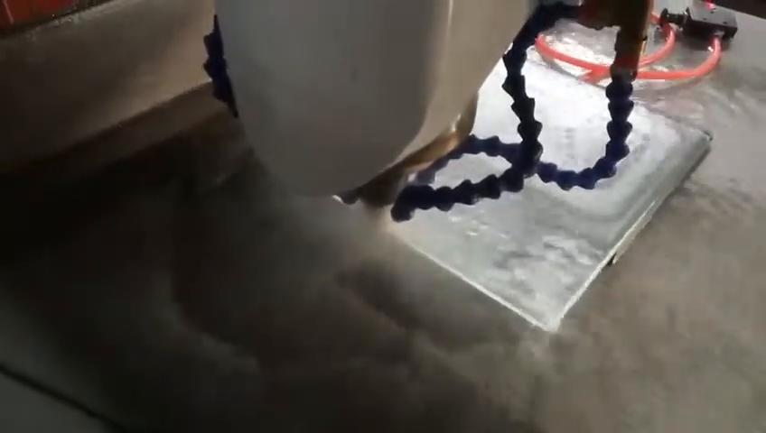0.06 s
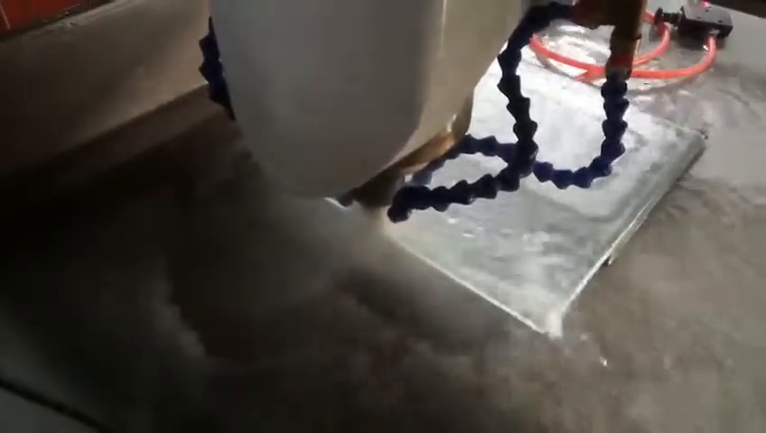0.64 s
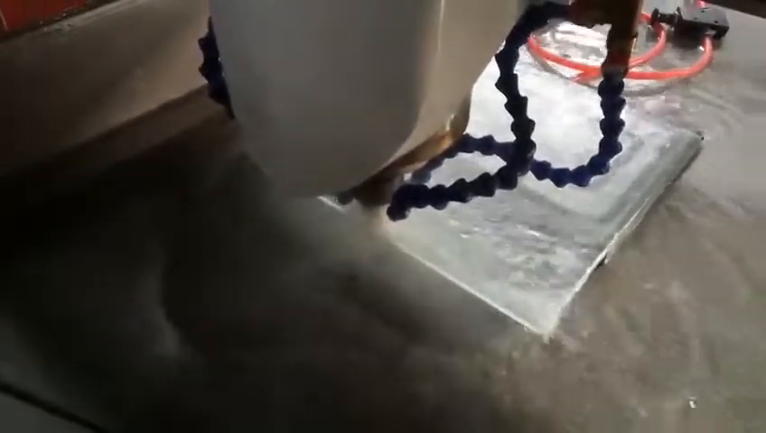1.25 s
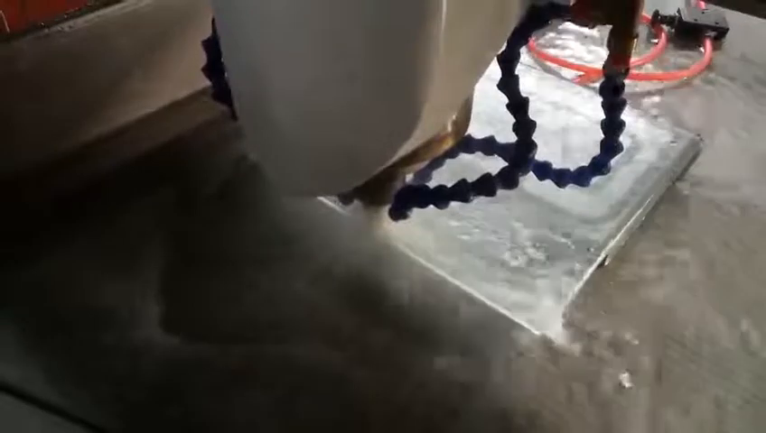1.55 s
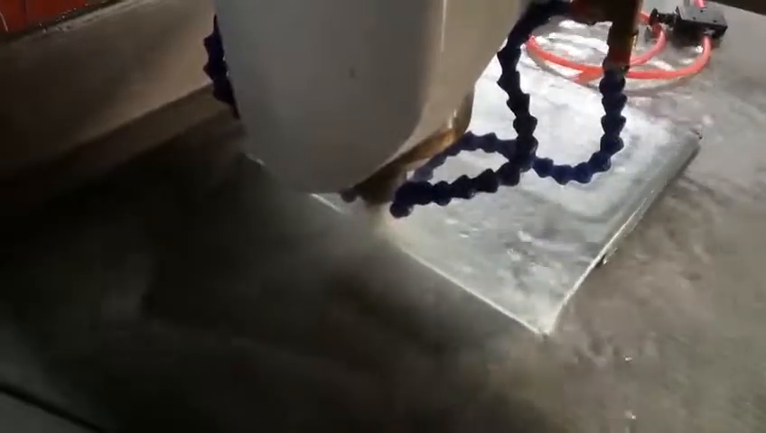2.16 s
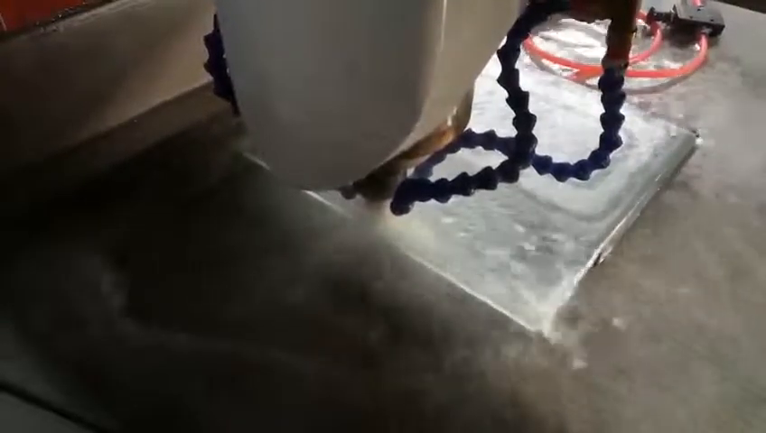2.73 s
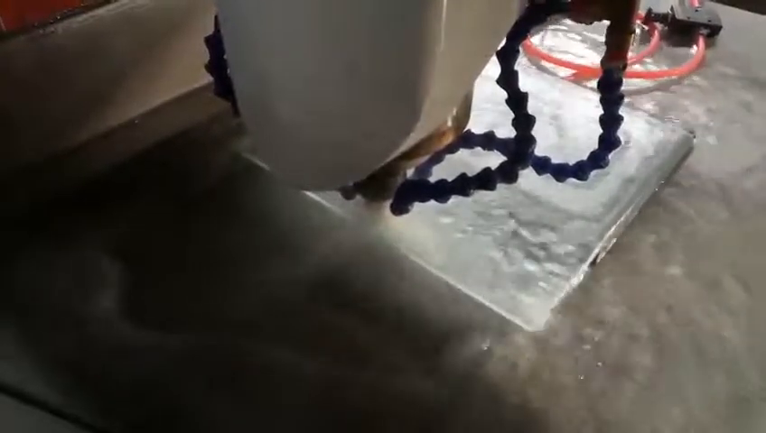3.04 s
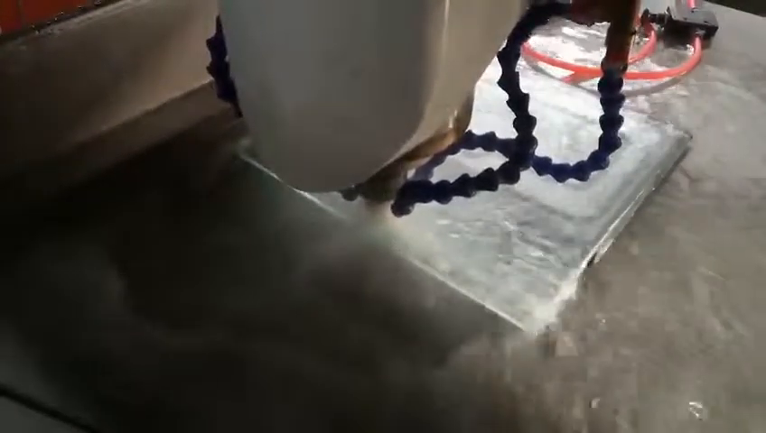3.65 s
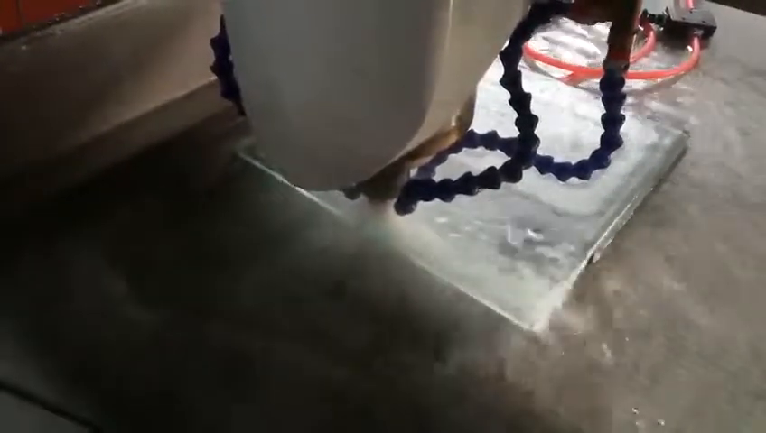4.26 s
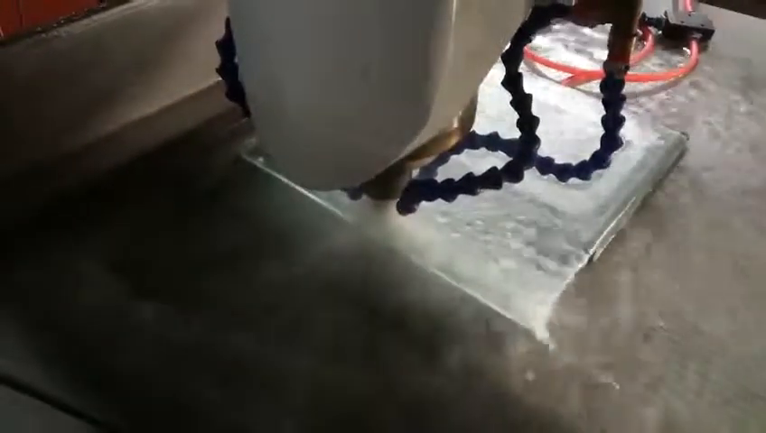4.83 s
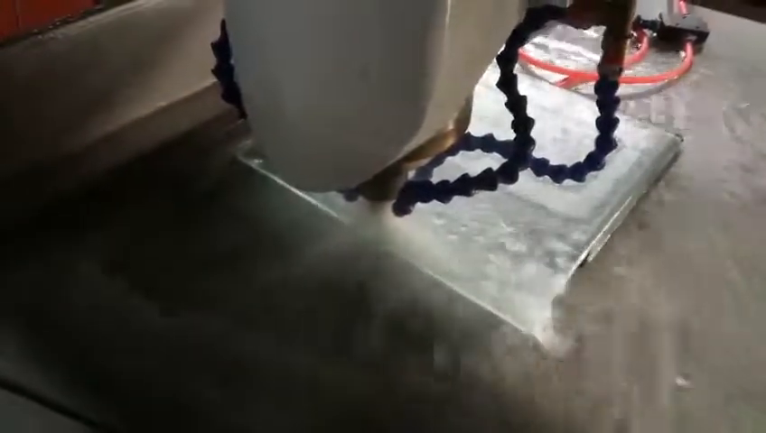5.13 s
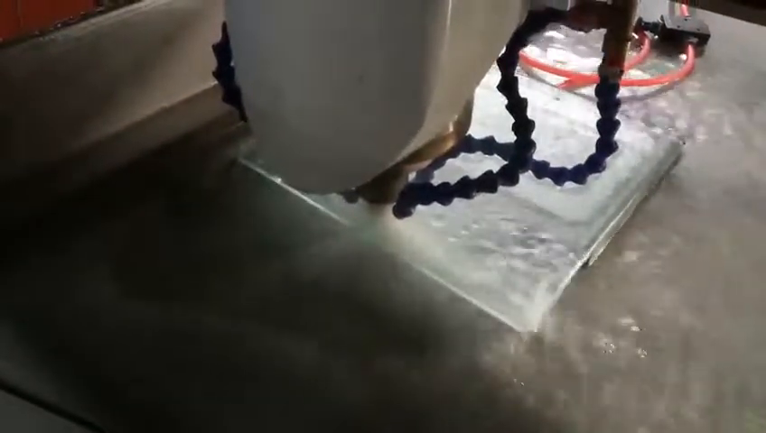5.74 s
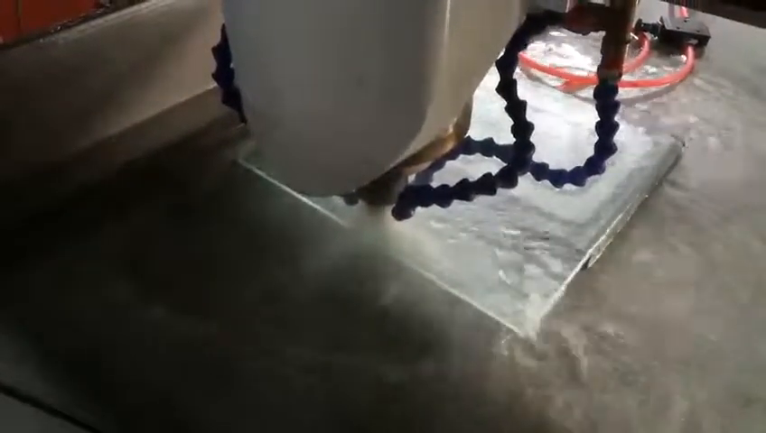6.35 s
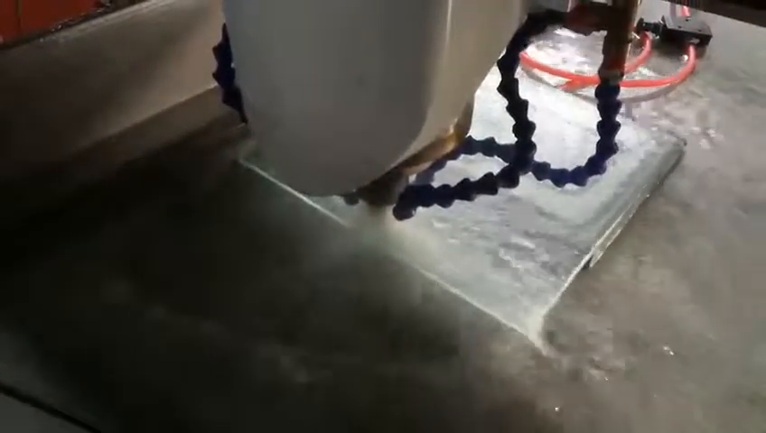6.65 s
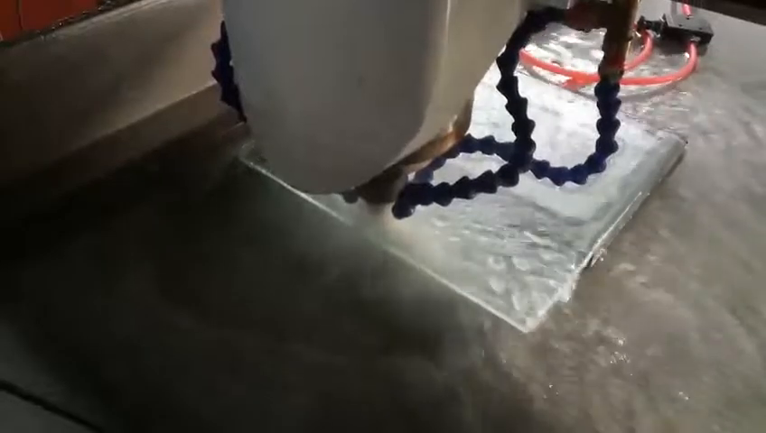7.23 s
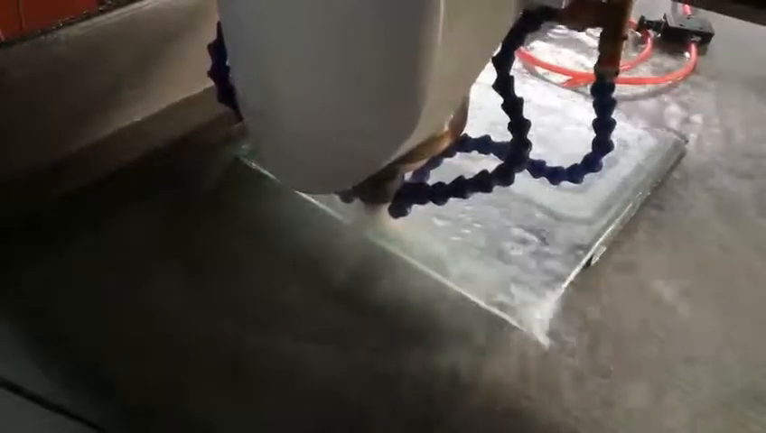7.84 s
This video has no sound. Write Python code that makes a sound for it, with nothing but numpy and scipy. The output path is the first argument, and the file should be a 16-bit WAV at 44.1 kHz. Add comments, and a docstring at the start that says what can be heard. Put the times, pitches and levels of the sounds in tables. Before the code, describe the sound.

Close, high-pitched whine of a tool grinding glass, with a steady hiss of grit and water and a run of shrill squeals.

```python
"""A stereo microphone close to a CNC spindle grinding the edge of a glass sheet under jets of water.
At first the tool, at about 24000 rpm, sings at multiples of its speed over a hiss of grit and spray;
a thin whistle comes in, and there is one short knock. Midway the cut tightens and glass and tool
chatter in a series of squeals. Then it runs freer and throws more spray, the machine's rumble surges
and the edge chips. A limiter holds down the highest peaks."""
import sys
import numpy as np
from scipy import signal
from scipy.io import wavfile
from scipy.ndimage import uniform_filter1d, minimum_filter1d

SR = 44100
rng = np.random.default_rng(int(sys.argv[2]) if len(sys.argv) > 2 else 0)


def generate_wav(signal):
    """Clip the signal to [-1, 1] and save it as 16-bit WAV at the path in sys.argv[1]."""
    frames = np.transpose(np.atleast_2d(signal))
    scaled = np.clip(frames, -1, 1) * 32767
    pcm = np.round(scaled).astype(np.int16)
    wavfile.write(sys.argv[1], SR, pcm)


N = 347949
TIME = np.arange(N) / SR

# The tool's tones from close by, keyed by order (multiple of its speed). Each row: relative level in dB
# in the full, tight and free cut, left over right in dB, phase lead of the left microphone in radians.
TOOL_ORDERS = {1: (-48, -53.5, -34, -4.5, 2.5), 2: (-18.5, -28.5, -27.5, 4, -1.87),
               3: (-40.5, -43.5, -39.5, 2.5, -1.5), 4: (-38, -33, -23.5, 4, -1.18),
               5: (-25, -32.5, -24, 5.5, 0.73), 6: (-38, -33.5, -26, 5, 1.2), 7: (-45, -38, -53, 1.5, -2.5),
               8: (-32.5, -41, -45, -3, -0.5), 9: (-17.5, -21.5, -23, -4, 0.5),
               10: (-34, -34.5, -27.5, 1.5, -2), 11: (-45, -35, -24.5, 8, 0.8),
               12: (-31, -36, -28.5, -2, -1.7), 13: (-45, -48, -31.5, 7, 0.5), 14: (-35, -32, -39, 8, 1),
               15: (-35.5, -40, -31, 8, 0.4), 16: (-45, -50, -29.5, 9, 1.24),
               17: (-32.5, -25.5, -28, 11, -3), 18: (-28.5, -27, -32.5, 9, -1.7),
               19: (-35, -50, -44, 3, 2.5), 20: (-29.5, -34, -23, 0.5, 3), 21: (-21, -28, -20, 13.5, 0.07),
               22: (-34, -36, -25.5, 9, 0.5), 23: (-40, -42, -34, 7, 0.7), 25: (-43, -47, -31.5, 9, 1.5),
               26: (-40, -53, -29.5, 2, -2)}
# As the tool travels, an order swells on a resonance of the sheet or fades at a node.
# Each row, under its order: middle in seconds, length in seconds, change in dB.
SHEET_SWELLS = {1: [(0.3, 2.45, 12)], 2: [(0.8, 0.38, -5.5), (5.0, 0.38, -3.5), (7.05, 1.3, -10)],
                3: [(0.1, 0.61, 9.5), (3.1, 0.82, 7.5), (5.68, 1, 10.5), (7.8, 0.64, 6)],
                4: [(0.55, 1.2, 9.5), (2.8, 0.34, 6), (4.05, 1.15, -14), (6.15, 0.58, 4.5),
                (6.9, 0.52, -3.5)], 5: [(0.23, 0.12, 3.5), (0.8, 0.38, 8.5), (1.7, 0.31, 4.5), (3.3, 1, 4),
                (5.35, 0.41, 5.5), (6.17, 0.41, 5.5), (7.7, 0.75, 6)], 6: [(0.55, 1.0, 11), (3.2, 1.3, -4)],
                7: [(0.7, 1.0, 7)], 8: [(1.05, 0.38, 7), (3.0, 0.71, 5), (4.3, 0.56, 5)],
                9: [(0.28, 0.73, -11.5), (3.3, 0.3, 3.5), (5.05, 0.49, -9), (7.85, 0.42, -3)],
                10: [(0.5, 1.9, 7.5), (6.8, 1.5, 7.5)], 11: [(5.65, 1.05, -4)], 16: [(6.68, 0.53, 9.5)],
                20: [(0.6, 0.9, 6), (6.9, 0.65, -6)], 21: [(0.17, 0.082, 8.5), (0.5, 0.29, 8),
                (2.35, 0.81, -14)], 25: [(6.05, 0.6, 8)]}
# Orders that reach the microphones straight from the sheet, so reflections sway them little.
DIRECT_ORDERS = [1, 2, 3, 4, 5, 6, 9, 10, 11, 21]
# Orders that move as the tool comes free. Each row: final left over right in dB, left lead in radians.
FREE_CUT_IMAGE = {1: (8.9, 0), 2: (9.3, -1.36), 5: (-1.2, 0.58), 6: (17, 2.17), 9: (9.5, 2.3),
                  10: (-0.92, -0.6)}
# The tool skates during the shriek and upper orders drop: middle and length in seconds, change in dB.
TOOL_SKATE = (5.0, 0.21, -3.5)
# Order 2 meets the two microphones equally loud, in opposite phase: middle and length in seconds.
OPPOSED_SPAN = (6.48, 0.55)


def spindle(angle, shake=0.12, shake_per_order=0.027, shake_hz=22, drift=0.47, drift_hz=1.73):
    """The tool strikes the glass once a turn; an uneven bite shakes the high orders most."""
    state, out = cut_state(TIME), np.zeros((2, N))
    bite = 1 - 0.27 * state / 2  # calmer as the cut runs free
    freed = np.clip(state - .8, 0, 1)
    skate_db = swells_db([TOOL_SKATE], TIME)
    shared_shake = flutter(shake_hz * 2, TIME).real
    for order, (*levels, balance_db, lead) in TOOL_ORDERS.items():
        db = by_state(levels, state) + swells_db(SHEET_SWELLS.get(order, []), TIME)
        db += (order > 4) * skate_db
        rough = (shake + shake_per_order * order) * bite
        phase = rng.uniform(-np.pi, np.pi)  # sheet and housing delay each order differently
        shaken = (1 + rough * (flutter(shake_hz, TIME) + 0.42 * shared_shake)) / np.sqrt(1 + rough ** 2)
        tone = amp(db) * np.exp(1j * (order * angle + phase)) * shaken
        # the travelling head shifts the reflections at each microphone
        reflections = np.array([flutter(drift_hz, TIME), flutter(drift_hz, TIME)])
        reflections *= drift * (.3 if order in DIRECT_ORDERS else .9)
        if order in FREE_CUT_IMAGE:
            free_db, free_lead = FREE_CUT_IMAGE[order]
            balance_db += (free_db - balance_db) * freed
            lead += (free_lead - lead) * freed
        if order == 2:
            opposed = hump(TIME, *OPPOSED_SPAN)
            balance_db *= 1 - opposed
            lead -= (np.pi + lead) * opposed
        out += (tone * (mic_gains(balance_db, lead) + reflections)).real
    return out


# The spindle's speed. Each row: time in seconds, turns per second.
SPINDLE_SPEED = [(0.0, 401.42), (0.9, 401.53), (1.44, 401.38), (2.52, 401.31), (3.48, 401.29),
                 (4.57, 401.68), (5.82, 401.76), (6.54, 401.89), (7.88, 401.81)]


def turns_per_s(t):
    """The spindle holds its speed almost steady."""
    return curve(SPINDLE_SPEED, t)


# The course of the cut. Each row: time in seconds, state (0 full, 1 tight and chattering, 2 free).
CUT_COURSE = [(0, 0), (3.2, 0.13), (3.7, 0.72), (4.2, 0.98), (5.05, 1.36), (5.5, 1.85), (5.85, 1.8),
              (6.05, 2.0)]


def cut_state(t):
    """The tool starts in a full cut, tightens, then runs free."""
    return curve(CUT_COURSE, t)


# Ways in which glass and tool chatter. Each row: roughness, share of haze, squareness of the swell, left
# over right in dB, left lead in radians, sidebands as pairs of offset in orders and relative dB.
CHATTER_KINDS = { "whistle": (0.45, 0.25, 6, 15, -2.04, [(-3, -14), (1, -13), (2, -18.5), (3, -16.5),
                 (5, -9.5), (7, -21)]), "howl": (0.15, 0, 3, 1, 1.34, [(-1, -23.5), (1, -12), (2, -21),
                 (3, -20.5), (4, -6), (5, -10), (6, -15.5), (9, -16)]),
                 "screech": (0.56, 0.71, 3.4, 9, 2, [(-5, -17.5), (-1, -12), (1, -5.5), (2, -8), (3, -7),
                 (4, -15), (5, -10.5)]), "shriek": (0.39, 0.28, 3.2, 9.5, -1.25, [(1, -10.5), (4, -20)]),
                 "squeak": (0.22, 0.14, 1.9, 9.3, 1.4, [(-1, -20), (3, -10), (7, -4.5)]),
                 "rasp": (1.5, 1, 2.7, 4.2, 0.37, [(-1, -3), (5, 3), (15, 1), (16, -1)])}
# Chatter that knocks hard enough to have overtones. Each row: multiple of its pitch, relative dB.
CHATTER_OVERTONES = {"howl": [(3, -14.5), (4, -16), (5, -14)]}
# Squeals at the cut. Each row: kind, middle in seconds, length in seconds, pitch in Hz,
# glide in Hz per second, relative level in dB.
CHATTER_BURSTS = [("whistle", 2.32, 2.25, 8724, -2, -17), ("whistle", 3.75, 0.64, 8709, -18, -11),
                  ("howl", 3.78, 0.32, 1965, 8.6, -27), ("howl", 4.35, 0.76, 1978, 27, -19.5),
                  ("screech", 4.47, 1.05, 7155, 0, -19.5), ("shriek", 4.96, 0.21, 6793, 39, -10.5),
                  ("squeak", 5.122, 0.098, 5585, 0, -15.5), ("screech", 5.42, 0.6, 7155, 0, -19),
                  ("squeak", 5.52, 0.16, 5592, 0, -26), ("squeak", 5.875, 0.28, 5595, -8, -14.5),
                  ("howl", 6.09, 0.17, 1990, 0, -26.5), ("rasp", 7.15, 0.55, 1938, 0, -35.5),
                  ("rasp", 7.8, 0.35, 1935, 0, -38)]


def chatter(angle, rough_hz=18, waver_hz=2.6, full_cut_waver_hz=15, haze_hz=220):
    """Self-excited vibrations swell and die; the turning tool chops each into sidebands."""
    out = np.zeros((2, N))
    for kind, middle, length, pitch_hz, glide, level_db in CHATTER_BURSTS:
        rough, haze, squareness, balance_db, lead, sidebands = CHATTER_KINDS[kind]
        on = abs(TIME - middle) < length
        t = TIME[on]
        # in the full cut the grit keeps knocking the squeal off its pitch
        unsettled = np.clip(1 - 2 * cut_state(t), 0, 1)
        waver = (waver_hz + full_cut_waver_hz * unsettled) * flutter(rough_hz, t).real
        hz = pitch_hz + glide * (t - middle) + waver
        rough = rough + unsettled
        shaken = (1 + rough * flutter(rough_hz, t)) / np.sqrt(1 + rough ** 2)
        swing = np.exp(2j * np.pi * np.cumsum(hz) / SR)
        tone = amp(level_db) * hump(t, middle, length, squareness) * shaken * swing
        # grit smears the squeal into a band of noise
        smear = 1 + haze * np.array([flutter(haze_hz, t), flutter(haze_hz, t)])
        out[:, on] += (tone * smear * mic_gains(balance_db, lead)).real
        for multiple, db in CHATTER_OVERTONES.get(kind, []):
            out[:, on] += (amp(db) * tone * swing ** (multiple - 1) * mic_gains(balance_db, 0)).real
        for offset, db in sidebands:
            phase, side_lead = rng.uniform(-np.pi, np.pi, 2)
            chop = np.exp(1j * (offset * angle[on] + phase)) * (1 + rough / 2 * flutter(rough_hz, t))
            out[:, on] += (amp(db) * tone * chop * mic_gains(balance_db * 2.2, side_lead / 2)).real
    return out


# Abrasive grit scratching the glass, heard close up.
# Each row: frequency in Hz, relative noise density in dB in the full, tight and free cut.
GRIT_SPECTRUM = [(378, -69.5, -70, -75), (780, -50, -55, -59.5), (1140, -62.5, -61, -82),
                 (1560, -64, -57, -53), (2030, -49, -56, -52), (2320, -50.5, -56.5, -54.5),
                 (3020, -59, -61.5, -62), (3880, -45.5, -58, -47), (4100, -49.5, -59, -55.5),
                 (5830, -55.5, -49.5, -55.5), (7400, -52.5, -51.5, -51), (8730, -40, -41, -42.5),
                 (8860, -60, -39, -55), (10440, -51, -53.5, -58.5), (12600, -59, -65, -55),
                 (14300, -76, -74, -72)]


def grit(hz, off_ridge_hz, state, speed, ridge_hz=58):
    """Each turn recuts the last turn's scratches, so noise gathers in ridges just under the orders."""
    ridges = (hz > speed / 2) / (1 + (off_ridge_hz / ridge_hz) ** 2) ** 2
    return amp(spectrum_db(GRIT_SPECTRUM, hz, state)) * ridges


# Hiss of spray over low rumble. Each row: frequency in Hz, relative noise density in dB in the full, tight and
# free cut.
SPRAY_SPECTRUM = [(25, -79, -82, -76), (58, -76, -74, -77), (86.5, -64.5, -63, -65), (150, -78, -80, -65.5),
                  (239, -77, -76, -68), (610, -66, -71.5, -64.5), (1530, -69.5, -72.5, -65.5),
                  (1930, -59, -79, -55.5), (2240, -63.5, -99, -76), (2420, -66, -85, -62),
                  (2930, -76.5, -67, -61), (3370, -58, -79, -67), (3830, -53, -60, -59.5),
                  (4300, -61, -65, -56), (6000, -58.5, -63.5, -60), (7700, -55, -57, -55.5),
                  (10250, -56, -57, -56.5), (13160, -64, -66, -69.5), (13900, -68, -62, -58.5),
                  (14300, -76, -84, -80)]


def spray(hz, off_ridge_hz, state, speed, valley_db=7, valley_below_hz=5500):
    """Spray hiss, thinner in the midrange between the tool's tones, most of all in the tight cut."""
    between = np.sin(np.pi * off_ridge_hz / speed) ** 2 * (hz > speed)
    midrange = 1 / (1 + (hz / valley_below_hz) ** 6)
    thinning_db = valley_db * between * midrange * by_state((.6, 1, .3), state)
    return amp(spectrum_db(SPRAY_SPECTRUM, hz, state) - .5 - thinning_db)


# Water thrown off the tool. Each row: time in seconds, relative strength in dB.
SPLASH_STRENGTH = [(0, 1.5), (.45, 1), (.7, -0.5), (1.3, -0.5), (3.1, 0), (4.8, -0.5), (5, -5), (5.3, -4.5),
                   (5.9, -1), (6.3, -4), (6.7, -1.5), (7.15, 0.5), (7.55, -1.2), (7.89, -0.5)]
# Surges of the machine's low rumble. Each row: middle in seconds, length in seconds, rise in dB.
RUMBLE_SURGES = [(6.773, 0.24, 11), (7.45, 0.84, 10.5)]
# Narrow dips in the hiss. Each row: frequency in Hz, width in Hz, depth in dB.
HISS_DIPS = [(962, 44, 7.5), (1750, 34, 9), (2220, 57, 9), (13340, 360, 6.5)]
# The hiss at the microphone pair. Each row: frequency in Hz, coherence, left lead in radians,
# left over right in dB.
HISS_IMAGE = [(30, 0.18, 2, 7), (111.5, 0.95, 3.07, 1), (250, 0.89, 3.07, 1), (550, 0.81, 3.6, 2),
              (1030, 0.55, 3.77, 5), (1620, 0.19, 5.9, 5), (2640, 0.67, 9.38, 1), (3410, 0.36, 12.6, 1),
              (4260, 0.47, 15.7, -3), (5050, 0.21, 18.7, 2.5), (6500, 0.16, 23.3, 7), (8560, 0.15, 28.1, 5),
              (12600, 0.2, 30.76, 0)]


def hiss(lags_hz=(36, 12, 62), slip=0.0099, patchy_db=2, flicker_db=1.5, splash_hz=4500, rumble_hz=125):
    """Grit, spray and rumble reach the two microphones as one flickering, partly coherent noise."""
    frames = dict(fs=SR, nperseg=2048, noverlap=1536)
    white = rng.standard_normal((2, N)) * np.sqrt(SR / 2)
    hz, t, (shared, separate) = signal.stft(white, **frames)
    hz, state, speed = hz[:, None], cut_state(t), turns_per_s(t)
    # in the tight cut the chatter runs slower than the tool, so the high ridges fall further behind
    lag_hz = by_state(lags_hz, state) + slip * hz * by_state((0, 1, 0), state)
    off_ridge_hz = (hz + lag_hz + speed / 2) % speed - speed / 2
    bass = 1 / (1 + (hz / rumble_hz) ** 6)
    surge_db = bass * (hz > 50) * swells_db(RUMBLE_SURGES, t)
    # a heavier splash mostly fills out the midrange; the fine mist stays steadier
    splash_db = curve(SPLASH_STRENGTH, t) * (0.49 + 1 / (1 + (hz / splash_hz) ** 2)) * (1 - bass)
    wash = spray(hz, off_ridge_hz, state, speed) * amp(splash_db + surge_db)
    scratch = grit(hz, off_ridge_hz, state, speed) * amp(splash_db / 2)
    patches = uniform_filter1d(rng.standard_normal(shared.shape), size=12, axis=0)
    patches = uniform_filter1d(patches, size=4, axis=1)
    uneven_db = patchy_db * patches / patches.std() + flicker_db * rng.standard_normal(len(t))
    dips_db = sum(depth * np.exp(-((hz - centre) / width) ** 2) for centre, width, depth in HISS_DIPS)
    level = np.hypot(wash, scratch) * amp(uneven_db - dips_db)
    coherence, lead, balance_db = (curve(HISS_IMAGE, hz, column) for column in (1, 2, 3))
    right = coherence * shared + np.sqrt(1 - coherence ** 2) * separate
    pair = np.array([shared, right]) * mic_gains(balance_db, lead)
    return signal.istft(pair * level, **frames)[1][:, :N]


def pulsing(noise, angle, throb=0.16, sputter=0.16, sputter_hz=60, above_hz=5000):
    """The treble of the hiss throbs with every turn and sputters as water hits the tool."""
    treble = signal.sosfiltfilt(signal.butter(2, above_hz, "high", fs=SR, output="sos"), noise)
    return noise + treble * (throb * np.cos(angle) + sputter * flutter(sputter_hz, TIME).real)


# The spell in which the edge chips: middle and length in seconds.
CHIP_SPAN = (7.13, 0.42)
# Where the sheet rings to a chip. Each row: low and high band edge in Hz.
SHEET_BANDS = [(1450, 2400), (3600, 5000)]


def chipping(gain_db=1, peak_chips_per_s=160):
    """Tiny flakes snap off the edge at random; each rings the sheet for a moment."""
    breaks = rng.random(N) < peak_chips_per_s / SR * hump(TIME, *CHIP_SPAN)
    strength = np.minimum(rng.exponential(1, N), 2)
    snaps = amp(gain_db) * breaks * strength * rng.uniform(.5, 1, (2, N))
    rings = (signal.butter(2, band, "band", fs=SR, output="sos") for band in SHEET_BANDS)
    return sum(signal.sosfilt(ring, snaps) for ring in rings)


# One knock: start in seconds, level of the push in dB, frequency in Hz above which it turns dull.
KNOCK_PUSH = (1.501, -3, 3500)


def knock(decay_s=0.00017):
    """One short push, louder at the left microphone."""
    start, db, dull_hz = KNOCK_PUSH
    push = amp(db) * (TIME >= start) * np.exp(-abs(TIME - start) / decay_s)
    band = signal.butter(1, [550, dull_hz], "band", fs=SR, output="sos")
    return signal.sosfilt(band, push) * np.array([[1], [.5]])


def amp(db):
    """Decibels to gain."""
    return 10 ** (np.asarray(db) / 20)


def curve(rows, t, column=1):
    """One column of a table, joined by straight lines."""
    rows = np.asarray(rows, float)
    return np.interp(t, rows[:, 0], rows[:, column])


def by_state(levels, state):
    """Blends the values for the full, tight and free cut."""
    return sum(level * np.maximum(1 - abs(state - k), 0) for k, level in enumerate(levels))


def spectrum_db(rows, hz, state):
    """A noise spectrum for the present state of the cut."""
    return by_state([curve(rows, hz, column) for column in (1, 2, 3)], state)


def hump(t, middle, length, squareness=3.2):
    """A swell, half high at the ends of its length; squareness 2 is a bell, more flattens the top."""
    return .5 ** np.minimum(abs(2 * (t - middle) / length) ** squareness, 20)


def swells_db(rows, t):
    """The summed level change of several humps."""
    return sum(db * hump(t, middle, length) for middle, length, db in rows)


def flutter(width_hz, t, size=16384):
    """Complex random motion of power 1, mostly slower than width_hz."""
    hz = np.fft.fftfreq(size, TIME[-1] / size)
    white = rng.standard_normal(size) + 1j * rng.standard_normal(size)
    motion = np.fft.ifft(white / (1 + (hz / width_hz) ** 2))
    return np.interp(t, np.linspace(0, TIME[-1], size), motion / motion.std())


def mic_gains(balance_db, lead):
    """Complex gains of the left and right microphone, with mean power 1."""
    left = np.atleast_1d(amp(balance_db) * np.exp(1j * lead))
    return np.array([left, np.ones_like(left)]) * np.sqrt(2 / (1 + abs(left) ** 2))


def scene():
    """Close to the cut: tones, sidebands and the throb of the hiss follow the angle of the spindle."""
    angle = 2 * np.pi * np.cumsum(turns_per_s(TIME)) / SR
    tones = amp(2.0) * spindle(angle) + amp(4.0) * chatter(angle)
    return tones + pulsing(hiss(), angle) + chipping() + knock()


def record(dry, limiter_samples=200, edge_hz=14600):
    """The recorder's fast limiter holds the highest peaks at full scale; a steep low-pass follows."""
    headroom = minimum_filter1d(1 / np.maximum(abs(dry), 1), limiter_samples, axis=1)
    limited = dry * uniform_filter1d(headroom, limiter_samples, axis=1)
    lowpass = signal.firwin(511, edge_hz, window=("kaiser", 9), fs=SR)
    return signal.oaconvolve(limited, lowpass[None], "same")


dry = scene()
out = record(dry)
generate_wav(out)
```